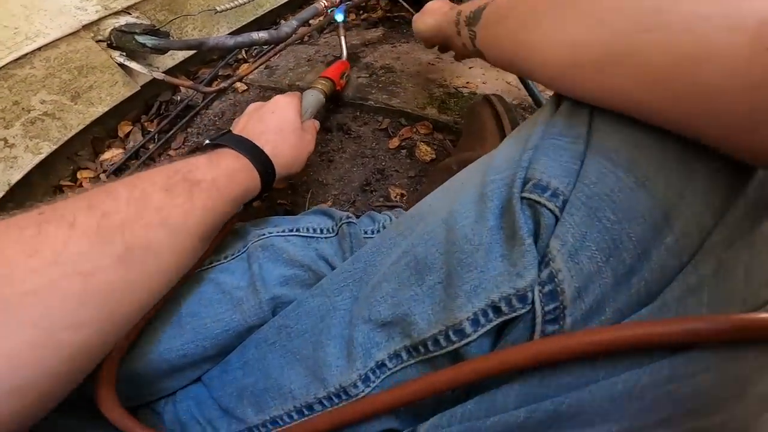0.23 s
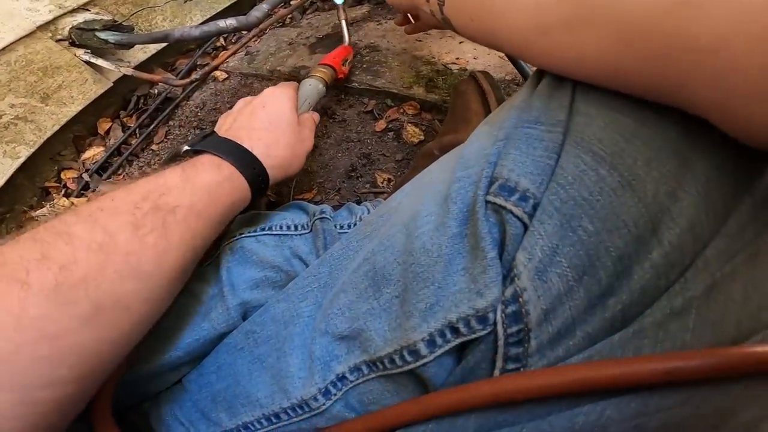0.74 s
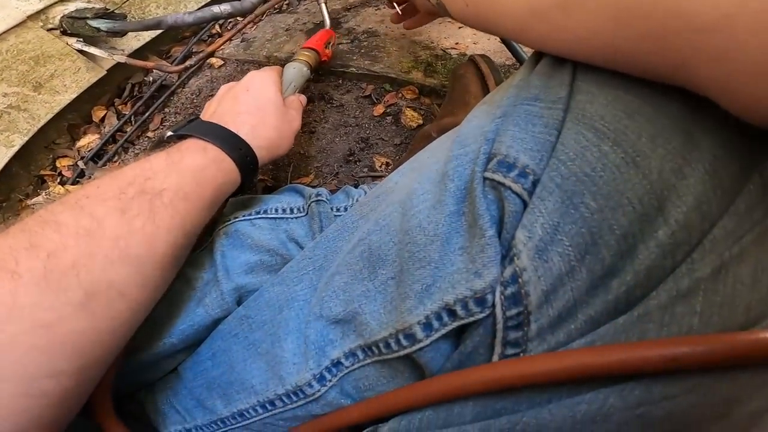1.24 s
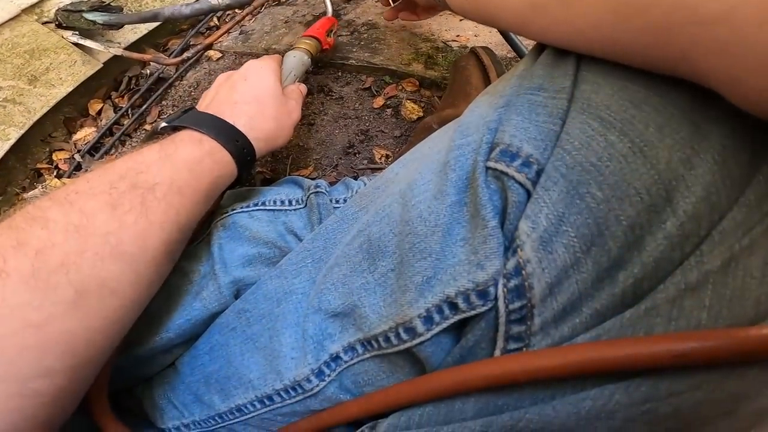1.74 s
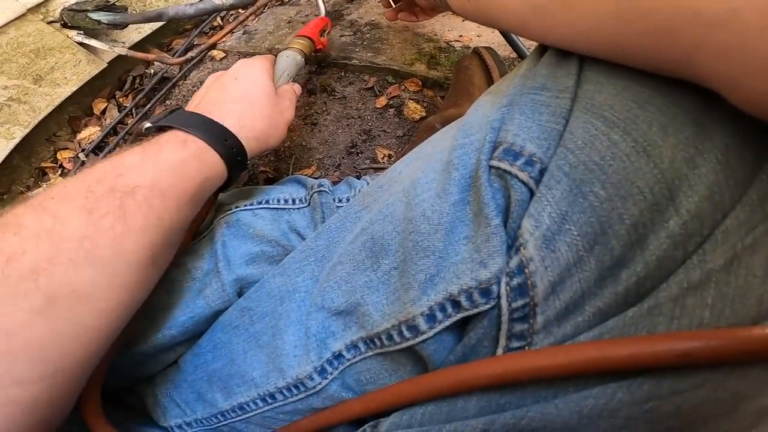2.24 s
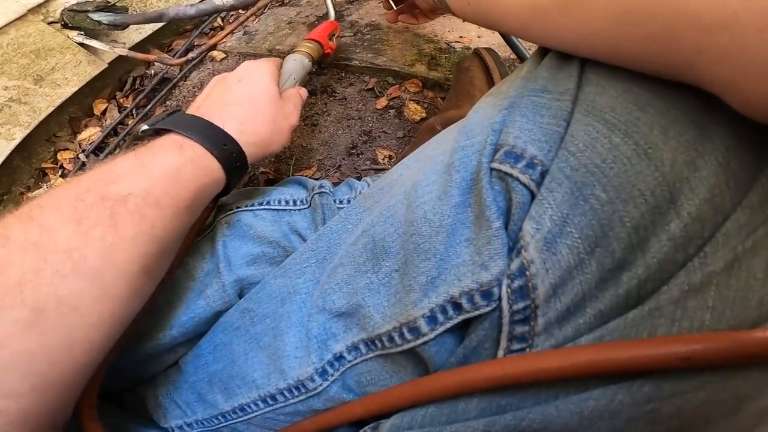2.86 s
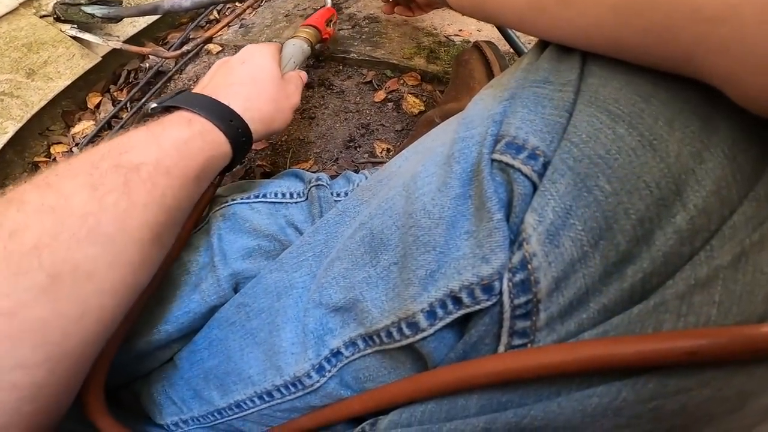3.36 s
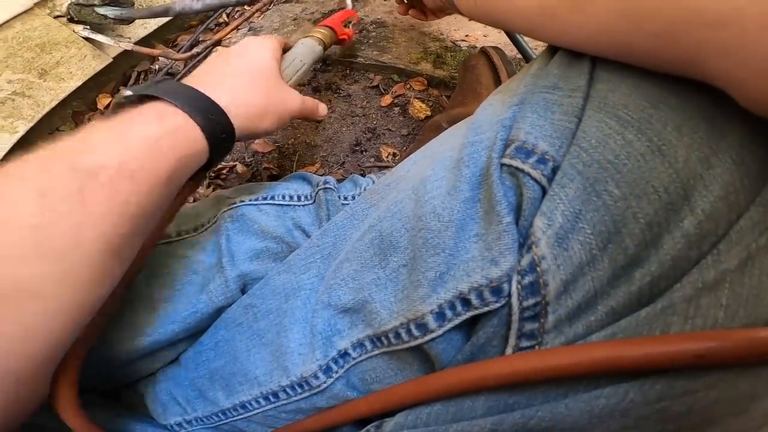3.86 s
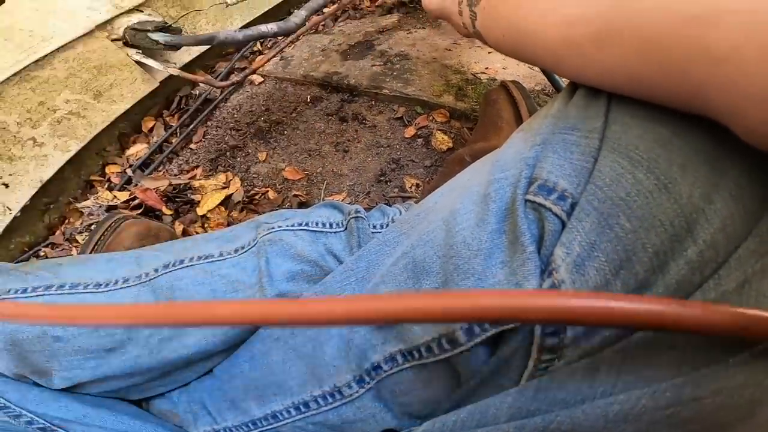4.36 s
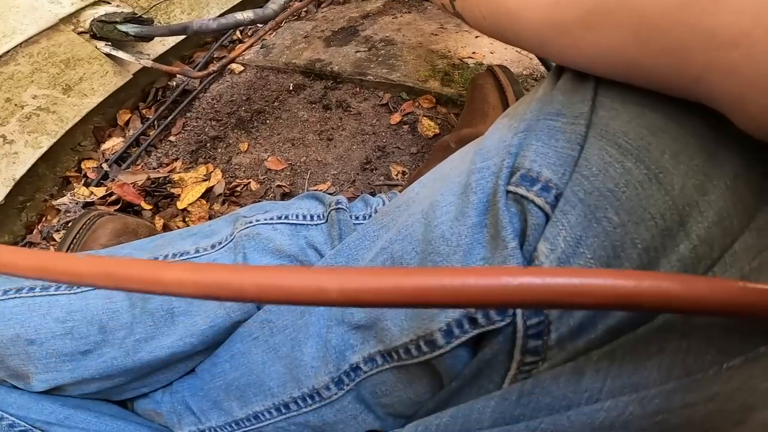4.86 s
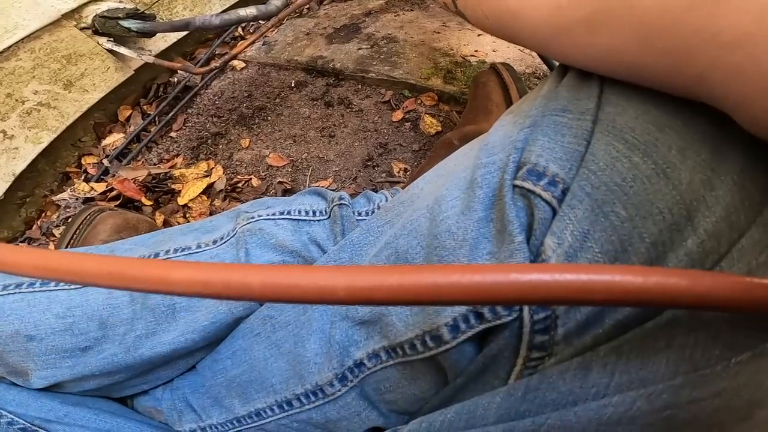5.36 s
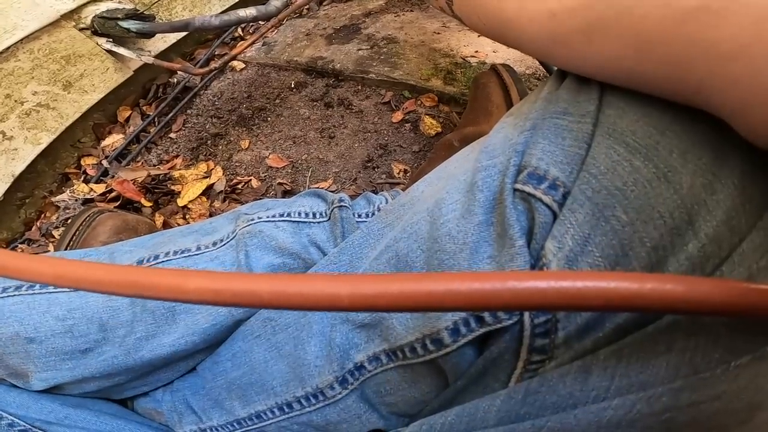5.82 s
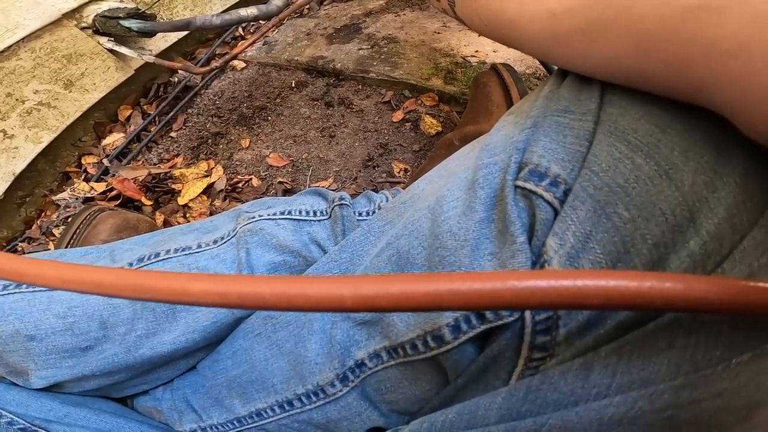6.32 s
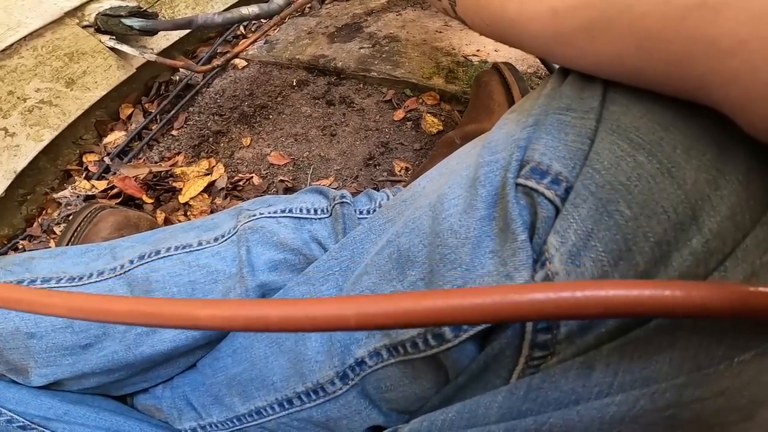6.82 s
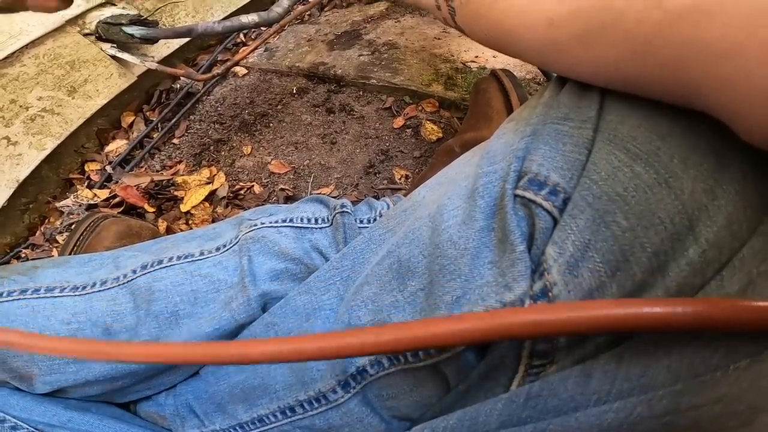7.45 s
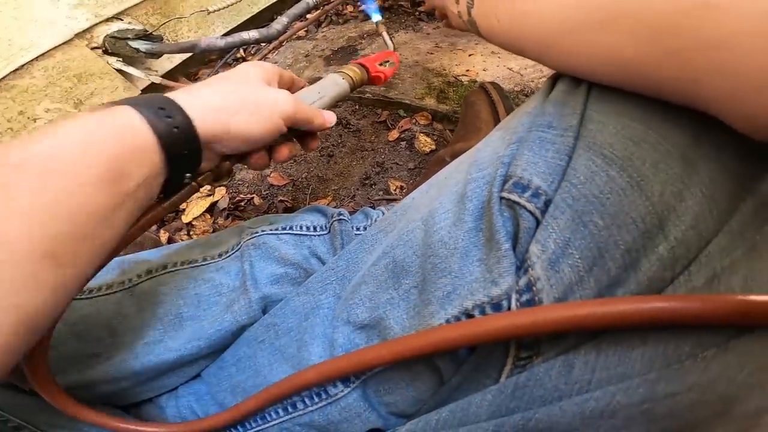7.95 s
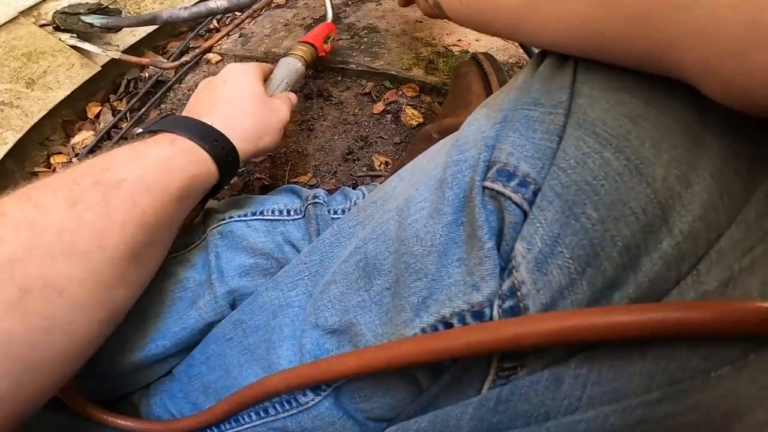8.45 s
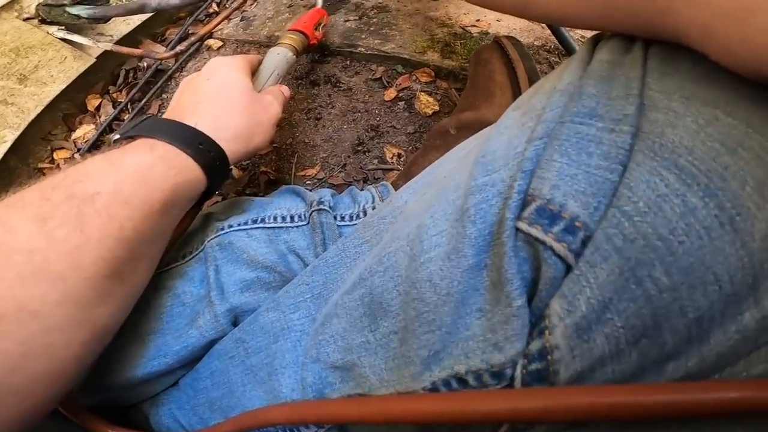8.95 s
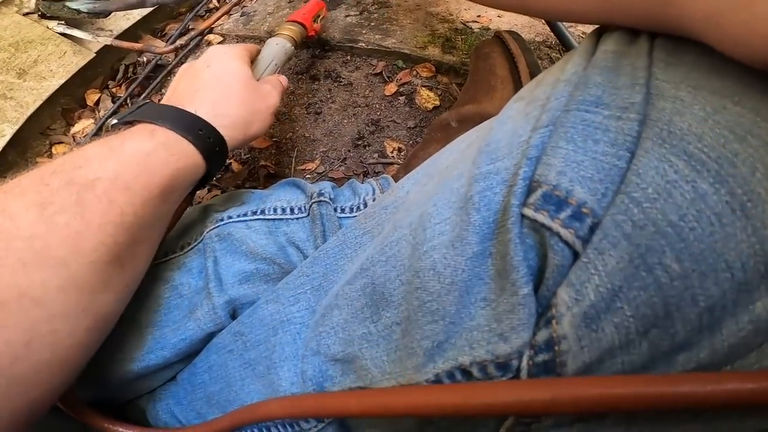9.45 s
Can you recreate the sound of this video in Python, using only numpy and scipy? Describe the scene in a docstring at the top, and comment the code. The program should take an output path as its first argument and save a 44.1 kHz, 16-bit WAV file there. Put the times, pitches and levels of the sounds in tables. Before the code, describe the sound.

Heard from chest height in an outdoor spot, a gas torch flame hisses and roars without a break while heating a pipe joint. Its loudness stays even, but the colour shifts and swishes slightly whenever the hand moves, and a thin, airy whistle drifts up and down. The low roar eases for a couple of seconds, then returns. Far-off rumble is barely there, and a soft hum rises late.

```python
"""Brazing torch outdoors

A turbulent gas flame roars low and hisses high, with a breathy whistle from the jet. Reflections off
a wall, the ground and the seated worker's knees comb the noise at two chest-high microphone ports.
The comb holds while the hand is still and slides as the torch swings aside and back.
A far rumble lies underneath, and a faint hum comes up late."""
import sys
import numpy as np
from scipy import signal
from scipy.fft import rfft, irfft, next_fast_len
from scipy.io import wavfile
from scipy.ndimage import uniform_filter1d, map_coordinates

SR = 44100
rng = np.random.default_rng(int(sys.argv[2]) if len(sys.argv) > 2 else 0)


def generate_wav(signal):
    """Clip the signal to [-1, 1] and save it as 16-bit WAV at the path in sys.argv[1]."""
    frames = np.transpose(np.atleast_2d(signal))
    scaled = np.clip(frames, -1, 1) * 32767
    pcm = np.round(scaled).astype(np.int16)
    wavfile.write(sys.argv[1], SR, pcm)


N = 427329
FRAME_SAMPLES, OVERLAP_SAMPLES = 1024, 768


def amp(db):
    """dB to gain."""
    return 10 ** (np.asarray(db) / 20)


def unit_rms(x):
    """Scale to rms 1."""
    return x / np.sqrt(np.mean(x ** 2) + 1e-20)


def over_frequency(rows, hz):
    """Interpolate (freq_hz, value) rows on a log axis."""
    freq_hz, values = np.transpose(rows)
    return np.interp(np.log(hz + 1), np.log(freq_hz + 1), values)


def over_time(rows, t):
    """Interpolate each column after time_s at times t."""
    time_s, *columns = np.transpose(rows)
    return [np.interp(t, time_s, column) for column in columns]


def wobble(rate_hz, size):
    """Smooth random curve spanning the scene, rate_hz knots a second."""
    knots = N * rate_hz / SR
    return map_coordinates(rng.standard_normal(int(knots) + 4), [np.linspace(0, knots, size)])


def noise_spectra(channels):
    """Frequencies, times and short-time spectra of white noise."""
    white = rng.standard_normal((channels, N))
    return signal.stft(white, SR, nperseg=FRAME_SAMPLES, noverlap=OVERLAP_SAMPLES)


def to_samples(spectra):
    """Short-time spectra to waveforms."""
    return signal.istft(spectra, SR, nperseg=FRAME_SAMPLES, noverlap=OVERLAP_SAMPLES)[1][:, :N]


# Rumble spectrum: freq_hz, level_db
RUMBLE_SPECTRUM = [(20, -16), (45, 2), (80, 9), (140, -12), (300, -42)]


def rumble(level_db=-46):
    """Steady low noise of the neighbourhood, mostly common to both ports."""
    hz, _, noise = noise_spectra(channels=3)
    stereo = noise[0] + 0.42 * noise[1:]
    colour = amp(over_frequency(RUMBLE_SPECTRUM, hz))[:, None]
    return amp(level_db) * unit_rms(to_samples(colour * stereo))


# Hum course: time_s, pitch_hz, peak_db
HUM_TRACK = [(0, 71, -64), (7.3, 71, -56), (7.7, 71, -43), (9.69, 71, -42)]


def hum(wander_hz=2.5, waver_db=2.0):
    """Low, slightly unsteady tone from far off."""
    pitch_hz, peak_db = over_time(HUM_TRACK, np.arange(N) / SR)
    cycles = np.cumsum(pitch_hz + wander_hz * wobble(rate_hz=6, size=N)) / SR
    return amp(peak_db + waver_db * wobble(rate_hz=6, size=N)) * np.sin(2 * np.pi * cycles)


def sliding_comb(echoes, hz, drift_dm):
    """Sum of echoes whose delays follow the hand's drift; axes: port, frequency, time."""
    response = 0
    for left_ms, right_ms, left_gain, right_gain, slide_ms_per_dm in echoes:
        delay = np.exp(-2j * np.pi * np.outer([left_ms, right_ms], hz) / 1000)
        slide = np.exp(-2j * np.pi * np.outer(hz, slide_ms_per_dm * drift_dm) / 1000)
        echo = np.array([[left_gain], [right_gain]]) * delay
        response += echo[:, :, None] * slide
    return response / (1 + (hz[:, None] / 14000) ** 2)  # cloth and leaves absorb the top


def clutter_echoes(count, gain=0.09, slide_ms_per_dm=0.1):
    """Echo rows for weak, later reflections off litter and cables, each from its own side."""
    distance, side, strength, balance, slide = np.hsplit(rng.standard_normal((count, 5)), 5)
    delays_ms = 3.2 + 3 * np.abs(distance) + 0.03 * side * [1, -1]
    gains = gain * (strength + 0.4 * balance * [1, -1])
    return np.c_[delays_ms, gains, slide_ms_per_dm * slide]


# Near reflections, a list per torch position: left_ms, right_ms, left_gain, right_gain, slide_ms_per_dm
NEAR_ECHOES = [
    [(0.2, 0.193, -0.14, -0.21, 0.009), (0.323, 0.326, -0.18, -0.22, 0.002),
     (0.459, 0.458, -0.13, -0.18, -0.073), (0.668, 0.67, 0.14, 0.11, 0.123),
     (0.749, 0.745, -0.38, -0.35, -0.008), (0.767, 0.788, 0.11, 0.21, -0.085),
     (0.891, 0.902, -0.23, -0.09, -0.082), (1.142, 1.143, 0.13, 0.12, 0.063),
     (1.397, 1.423, 0.03, 0.13, -0.009), (1.595, 1.608, -0.18, -0.24, -0.002),
     (1.836, 1.808, -0.09, -0.09, -0.172), (1.88, 1.883, -0.13, -0.13, 0.004),
     (2.125, 2.121, 0.16, 0.12, 0.003), (2.276, 2.292, 0.12, 0.12, 0.049),
     (2.45, 2.47, -0.17, -0.14, 0.003), (3.443, 3.433, 0.09, 0.09, -0.015)],
    [(0.167, 0.165, 0.25, 0.27, 0.007), (0.186, 0.186, -0.18, -0.36, 0.007),
     (0.358, 0.342, -0.23, -0.27, 0.023), (0.449, 0.432, -0.15, -0.06, -0.162),
     (0.512, 0.592, 0.2, 0.12, 0.009), (0.527, 0.497, -0.07, -0.2, 0.175),
     (0.654, 0.624, 0.09, -0.21, 0.028), (0.812, 0.805, -0.1, -0.06, 0.154),
     (0.869, 0.877, -0.26, -0.22, 0.046), (1.228, 1.223, 0.17, 0.11, 0.079),
     (1.612, 1.648, -0.08, -0.18, 0.061), (1.668, 1.666, -0.02, -0.13, -0.063),
     (1.898, 1.894, -0.12, -0.1, -0.023), (2.17, 2.163, 0.13, 0.1, 0.079),
     (2.354, 2.329, 0.09, 0.14, 0.036), (2.449, 2.489, -0.13, -0.09, -0.034)],
    [(0.144, 0.145, 0.05, 0.08, 0.157), (0.205, 0.186, -0.09, -0.14, -0.005),
     (0.326, 0.35, -0.05, -0.17, -0.023), (0.415, 0.422, -0.07, -0.05, -0.212),
     (0.417, 0.42, 0.08, 0.05, 0.173), (0.545, 0.488, 0.16, -0.05, 0.018),
     (0.706, 0.733, -0.17, -0.16, -0.035), (0.791, 0.796, -0.31, -0.21, 0.001),
     (0.853, 0.859, 0.18, 0.24, -0.048), (0.98, 0.982, -0.22, -0.18, -0.023),
     (1.154, 1.139, 0.22, 0.24, -0.042), (1.304, 1.281, 0.07, 0.06, 0.192),
     (1.573, 1.605, -0.07, -0.14, -0.004), (1.66, 1.686, -0.12, -0.18, -0.001),
     (1.692, 1.696, 0.07, 0.08, -0.165), (1.779, 1.802, 0.14, 0.11, -0.004),
     (1.83, 1.84, -0.05, -0.06, -0.199), (2.231, 2.224, 0.05, 0.07, -0.057),
     (2.312, 2.32, 0.06, 0.04, -0.148), (2.34, 2.359, 0.09, 0.06, 0.02),
     (2.981, 2.978, -0.05, -0.05, 0.218), (3.201, 3.229, 0.04, 0.06, 0.041),
     (4.133, 4.145, -0.05, -0.04, -0.036)],
    [(0.169, 0.09, 0.28, -0.21, 0.006), (0.203, 0.195, -0.39, -0.18, 0.005),
     (0.247, 0.274, 0.37, 0.06, 0.012), (0.29, 0.318, -0.22, -0.29, 0.006),
     (0.534, 0.534, 0.16, -0.19, 0.006), (0.673, 0.688, -0.16, -0.12, 0.033),
     (0.748, 0.745, -0.2, -0.17, 0.047), (0.877, 0.869, 0.13, 0.2, -0.013),
     (0.946, 0.943, -0.23, -0.25, 0.036), (1.116, 1.108, 0.14, 0.12, 0.025),
     (1.389, 1.42, 0.12, -0.1, 0.011), (1.505, 1.517, -0.08, -0.07, 0.09),
     (1.594, 1.609, -0.07, -0.12, 0.006), (1.701, 1.687, -0.12, -0.12, -0.024),
     (1.768, 1.81, 0.1, 0.11, 0.01), (2.24, 2.191, 0.12, 0.16, 0.015), (2.336, 2.258, 0.08, 0.06, 0.023),
     (2.486, 2.49, -0.07, -0.09, 0.03), (2.665, 2.675, 0.07, 0.04, -0.076),
     (2.71, 2.731, -0.12, -0.07, 0.008), (3.171, 3.21, 0.09, 0.05, -0.017), (3.51, 3.513, 0.08, 0.06, 0.01),
     (3.697, 3.711, 0.05, 0.04, -0.002)],
    [(0.076, 0.074, -0.24, -0.31, 0.002), (0.189, 0.167, -0.14, -0.25, -0.0),
     (0.333, 0.322, -0.2, -0.29, 0.002), (0.444, 0.448, -0.09, -0.08, 0.013),
     (0.526, 0.553, 0.1, -0.21, 0.014), (0.658, 0.68, -0.32, -0.19, 0.007),
     (0.733, 0.725, -0.27, -0.2, 0.01), (0.807, 0.803, 0.08, 0.07, 0.14),
     (0.929, 0.932, -0.28, -0.26, 0.016), (0.982, 0.974, 0.06, 0.05, -0.125),
     (1.098, 1.091, 0.08, 0.05, -0.036), (1.132, 1.124, 0.1, 0.08, 0.069),
     (1.184, 1.18, -0.06, -0.14, 0.016), (1.392, 1.391, 0.12, -0.06, 0.032),
     (1.506, 1.481, -0.17, -0.13, 0.038), (1.696, 1.699, -0.06, -0.14, 0.018),
     (1.863, 1.89, 0.11, 0.1, 0.04), (2.253, 2.205, 0.18, 0.13, 0.033), (2.351, 2.318, 0.11, 0.06, 0.016),
     (2.498, 2.497, -0.08, -0.09, 0.023), (2.715, 2.723, -0.07, -0.04, 0.033),
     (3.188, 3.211, 0.08, 0.05, -0.01), (3.924, 3.941, -0.06, -0.02, 0.029)],
    [(0.09, 0.09, -0.59, -0.6, -0.004), (0.202, 0.185, -0.36, -0.43, -0.002),
     (0.3, 0.3, -0.45, -0.47, -0.009), (0.379, 0.372, -0.37, -0.37, -0.003),
     (0.535, 0.53, -0.18, -0.26, -0.043), (0.642, 0.635, -0.31, -0.33, 0.002),
     (0.737, 0.726, -0.26, -0.26, 0.018), (0.911, 0.882, -0.23, -0.21, 0.125),
     (1.061, 1.066, -0.25, -0.17, 0.087), (1.347, 1.35, -0.08, -0.1, -0.184),
     (1.364, 1.375, 0.15, 0.18, 0.26), (1.611, 1.611, 0.1, 0.14, 0.24), (1.85, 1.862, 0.18, 0.14, -0.074),
     (2.051, 2.047, 0.17, 0.12, 0.069), (2.365, 2.341, 0.13, 0.15, 0.059), (2.548, 2.486, 0.15, 0.1, 0.102)],
    [(0.155, 0.154, 0.45, 0.37, 0.233), (0.174, 0.17, -0.51, -0.4, 0.201),
     (0.243, 0.208, -0.23, -0.22, -0.019), (0.284, 0.269, -0.14, -0.11, 0.148),
     (0.309, 0.289, -0.24, -0.21, 0.004), (0.384, 0.366, -0.2, -0.25, 0.073),
     (0.514, 0.483, -0.15, -0.11, 0.147), (0.613, 0.588, 0.11, 0.16, 0.024),
     (0.686, 0.688, 0.07, 0.14, -0.139), (0.76, 0.773, -0.23, -0.18, 0.023),
     (0.952, 0.93, -0.2, -0.14, -0.018), (1.081, 1.053, -0.1, -0.13, 0.1),
     (1.116, 1.106, -0.17, -0.09, -0.01), (1.142, 1.148, -0.19, -0.15, -0.126),
     (1.775, 1.767, 0.14, 0.14, -0.0), (2.007, 1.993, -0.07, -0.16, -0.064)],
    [(0.121, 0.107, 0.11, 0.11, 0.131), (0.217, 0.22, -0.26, -0.1, 0.017),
     (0.251, 0.232, -0.07, -0.07, -0.185), (0.356, 0.346, -0.1, -0.13, 0.057),
     (0.536, 0.511, -0.05, -0.11, 0.057), (0.537, 0.417, 0.13, 0.2, -0.06),
     (0.569, 0.572, 0.15, 0.25, -0.001), (0.732, 0.729, -0.15, -0.2, 0.009),
     (0.987, 0.95, -0.28, -0.15, -0.016), (1.157, 1.146, 0.07, 0.09, 0.072),
     (1.192, 1.2, 0.12, 0.11, -0.111), (1.223, 1.212, -0.18, -0.19, -0.062),
     (1.384, 1.413, 0.08, 0.12, 0.0), (1.539, 1.521, -0.24, -0.14, -0.066),
     (1.747, 1.719, 0.09, 0.09, -0.004), (1.809, 1.812, -0.13, -0.17, -0.061),
     (1.98, 2.002, 0.09, 0.07, 0.171), (2.167, 2.124, -0.08, -0.09, -0.15),
     (2.472, 2.459, -0.08, -0.1, -0.009), (2.539, 2.507, 0.1, 0.08, -0.07),
     (2.749, 2.728, -0.13, -0.08, -0.009), (3.361, 3.342, 0.07, 0.09, -0.126),
     (3.84, 3.882, -0.07, -0.05, -0.03)],
    [(0.144, 0.143, 0.18, 0.24, -0.167), (0.151, 0.163, 0.15, 0.15, -0.019),
     (0.171, 0.159, -0.19, -0.26, -0.09), (0.21, 0.208, 0.08, 0.12, -0.183),
     (0.313, 0.339, 0.2, 0.18, 0.027), (0.474, 0.462, 0.26, 0.07, 0.009), (0.565, 0.552, 0.32, 0.24, 0.012),
     (0.773, 0.773, 0.07, 0.05, 0.027), (0.885, 0.882, 0.06, 0.12, -0.026),
     (0.971, 0.942, -0.09, 0.01, 0.063), (1.078, 1.065, 0.15, 0.15, 0.0),
     (1.213, 1.174, -0.06, -0.07, 0.162), (1.224, 1.233, 0.11, 0.1, 0.038),
     (1.358, 1.359, 0.16, 0.15, -0.001), (1.494, 1.494, -0.19, -0.12, 0.02),
     (1.704, 1.708, -0.04, -0.11, 0.02), (1.989, 2.01, -0.15, -0.16, 0.012),
     (2.199, 2.16, 0.07, 0.08, -0.045), (2.687, 2.635, -0.05, -0.07, 0.024),
     (2.859, 2.811, -0.08, -0.08, 0.027), (3.813, 3.813, -0.07, -0.02, 0.013),
     (4.388, 4.371, -0.06, -0.03, 0.016), (5.239, 5.259, 0.05, 0.02, -0.007)],
    [(0.192, 0.185, -0.24, -0.2, -0.201), (0.193, 0.197, -0.27, -0.3, -0.001),
     (0.245, 0.236, -0.1, -0.24, 0.122), (0.297, 0.311, -0.37, -0.38, 0.024),
     (0.302, 0.287, -0.15, -0.19, -0.177), (0.425, 0.429, -0.12, -0.13, 0.213),
     (0.556, 0.677, -0.13, -0.07, -0.288), (0.643, 0.665, -0.18, -0.13, 0.183),
     (0.669, 0.643, -0.25, -0.24, -0.009), (0.743, 0.727, -0.24, -0.28, -0.014),
     (0.882, 0.887, 0.13, 0.08, -0.015), (1.1, 1.11, -0.1, -0.12, 0.105), (1.588, 1.56, 0.16, 0.13, 0.11),
     (1.74, 1.731, -0.07, -0.15, 0.117), (2.59, 2.591, 0.06, 0.12, -0.006),
     (2.868, 2.86, -0.06, -0.09, 0.134)],
    [(0.109, 0.099, 0.21, 0.22, 0.189), (0.224, 0.212, -0.15, -0.41, 0.005),
     (0.26, 0.245, 0.32, 0.41, 0.014), (0.302, 0.312, -0.23, -0.2, 0.019),
     (0.697, 0.691, -0.23, -0.23, 0.006), (0.801, 0.799, -0.13, -0.16, 0.088),
     (0.884, 0.856, -0.16, -0.12, -0.121), (1.107, 1.128, -0.18, -0.17, -0.053),
     (1.15, 1.168, 0.12, 0.18, 0.024), (1.578, 1.546, 0.18, 0.09, -0.057),
     (1.718, 1.723, -0.11, -0.09, -0.112), (1.845, 1.852, 0.13, 0.1, 0.07),
     (2.13, 2.092, 0.18, 0.11, 0.039), (2.352, 2.357, 0.06, 0.1, 0.002), (2.579, 2.59, 0.06, 0.09, 0.055),
     (3.028, 3.011, -0.08, -0.07, -0.117)],
    [(0.097, 0.095, -0.5, -0.4, 0.014), (0.126, 0.118, -0.18, -0.12, -0.117),
     (0.159, 0.169, 0.43, 0.19, -0.077), (0.184, 0.178, -0.38, -0.43, 0.0),
     (0.204, 0.187, -0.11, -0.03, -0.042), (0.296, 0.287, -0.28, -0.23, -0.047),
     (0.357, 0.356, -0.25, -0.28, 0.039), (0.554, 0.568, -0.18, -0.24, -0.153),
     (0.572, 0.556, -0.25, -0.2, 0.145), (0.686, 0.689, -0.28, -0.2, 0.034),
     (0.772, 0.757, -0.16, -0.14, 0.2), (0.782, 0.774, -0.4, -0.29, -0.063),
     (0.946, 0.913, 0.1, 0.12, -0.144), (0.996, 1.004, -0.35, -0.29, -0.068),
     (1.172, 1.176, 0.11, 0.1, -0.159), (1.29, 1.286, -0.16, -0.2, -0.059),
     (1.62, 1.611, -0.15, -0.15, -0.01), (1.673, 1.678, -0.13, -0.21, 0.019),
     (2.129, 2.119, -0.11, -0.12, -0.065), (2.315, 2.328, 0.11, 0.07, 0.136),
     (2.736, 2.734, -0.15, -0.13, 0.007), (3.025, 3.025, -0.09, -0.05, 0.04),
     (4.064, 4.053, -0.07, -0.06, 0.181)],
    [(0.202, 0.178, 0.0, -0.11, -0.019), (0.33, 0.377, -0.29, 0.01, 0.013),
     (0.494, 0.485, 0.09, -0.12, -0.017), (0.641, 0.679, -0.29, -0.11, 0.0),
     (0.667, 0.714, -0.08, -0.04, 0.168), (0.715, 0.727, -0.05, 0.01, 0.007),
     (0.869, 0.824, 0.14, 0.03, -0.229), (0.883, 0.889, -0.06, -0.11, -0.074),
     (0.918, 0.931, -0.35, -0.17, -0.01), (1.08, 1.025, 0.18, 0.09, 0.009),
     (1.091, 1.049, 0.17, 0.05, 0.124), (1.32, 1.355, -0.03, -0.1, 0.011),
     (1.506, 1.569, -0.04, -0.07, -0.071), (1.559, 1.554, -0.24, -0.0, 0.072),
     (1.644, 1.663, -0.15, -0.23, -0.029), (1.81, 1.811, 0.18, 0.18, -0.046),
     (1.946, 1.916, -0.07, -0.08, 0.093), (2.277, 2.158, 0.11, 0.08, 0.039),
     (2.355, 2.307, 0.31, 0.11, 0.052), (2.762, 2.746, -0.05, -0.09, 0.019),
     (2.929, 2.906, -0.11, -0.03, -0.088), (3.241, 3.237, -0.11, -0.03, -0.075),
     (4.544, 4.521, -0.05, -0.06, 0.03)],
]
# Hand wander, a list per torch position: time_s, drift_dm
HAND_DRIFT = [
    [(0.0, -1.17), (0.1, 0.19), (0.21, 0.88)],
    [(0.21, -0.4), (0.32, -0.53), (0.44, 1.47)],
    [(0.44, 0.18), (0.73, -1.2), (1.01, 0.08), (1.3, 0.6)],
    [(1.3, -0.83), (1.62, -0.13), (1.93, 0.87), (2.25, -0.2)],
    [(2.25, -0.14), (2.67, 1.39), (3.09, -0.13), (3.51, -1.13), (3.93, 0.58)],
    [(3.93, -0.94), (4.06, 0.09), (4.18, 0.61)],
    [(4.18, -0.63), (4.35, -0.59), (4.52, 1.33)],
    [(4.52, -0.99), (4.7, -0.78), (4.87, 0.39), (5.05, 0.96)],
    [(5.05, -0.05), (5.67, -0.15), (6.29, -0.6), (6.91, 1.06), (7.53, 0.93)],
    [(7.53, -1.45), (7.7, 0.55), (7.86, 0.52)],
    [(7.86, -0.54), (8.05, -0.69), (8.24, 0.75)],
    [(8.24, -1.45), (8.43, 0.22), (8.62, 0.26), (8.8, 0.45)],
    [(8.8, -1.19), (9.1, 0.16), (9.39, 0.34), (9.69, 0.47)],
]
# Moves to the next position: midpoint_s
TORCH_MOVES = [.21, .44, 1.3, 2.25, 3.93, 4.185, 4.52, 5.05, 7.53, 7.86, 8.245, 8.8]


def sound_paths(hz, t, direct_gain=0.87, move_s=0.07, limb_hz=305):
    """Direct sound past the arms and knees plus echoes, crossfaded between torch positions."""
    moves_done = np.clip((t - np.array(TORCH_MOVES)[:, None]) / move_s + 0.5, 0, 1)
    position = moves_done.sum(axis=0)
    # Arms, knees and kerb are too small to reflect bass; litter reflects only treble.
    limb_highpass = (hz ** 2 / (hz ** 2 + limb_hz ** 2))[:, None]
    clutter_highpass = (hz / (hz + 2500))[:, None]
    paths = np.full((2, len(hz), len(t)), direct_gain, complex)
    for index, (echoes, drift) in enumerate(zip(NEAR_ECHOES, HAND_DRIFT)):
        weight = 1 - np.abs(position - index)
        active = weight > 0
        drift_dm, = over_time(drift, t[active])
        near = sliding_comb(echoes, hz, drift_dm) * limb_highpass
        clutter = sliding_comb(clutter_echoes(count=4), hz, drift_dm) * clutter_highpass
        paths[:, :, active] += (near + clutter) * weight[active]
    return paths


# Port colour: freq_hz, left_over_right_db
PORT_BALANCE = [(300, .6), (700, -1.3), (1400, 4), (3000, 3), (5500, 0), (10000, -0.3), (14000, -3)]


def port_response(hz, left_lag_s=0.016e-3):
    """Each port has its own colour; the right one is a few millimetres nearer the flame."""
    lag = np.exp(-2j * np.pi * np.outer([left_lag_s, 0], hz))
    balance = amp(np.outer([0.5, -0.5], over_frequency(PORT_BALANCE, hz)))
    return (lag * balance)[:, :, None]


# Jet whistle: time_s, pitch_hz, level_db
WHISTLE_TRACK = [(0, 3400, -2), (.13, 3500, -6), (.3, 4000, -10), (.46, 3520, -4), (.83, 3360, -7.5),
                 (1.15, 3560, -9), (1.4, 3760, -5), (1.91, 3470, -8), (2.3, 3800, -6), (2.8, 3480, -7),
                 (3.2, 3680, -21), (3.9, 3550, -9), (4.2, 3400, -11), (4.4, 3320, -8), (4.6, 3440, -6.5),
                 (4.85, 3580, -7.5), (5.1, 3720, -7.5), (5.8, 3790, -2), (6.4, 3790, -5.5),
                 (6.9, 3670, -10), (7.4, 3670, -13), (7.62, 3380, -6), (7.95, 3520, -6), (8.2, 3800, -9),
                 (8.35, 3380, -5), (8.7, 3440, -10), (8.95, 3800, -7), (9.69, 3780, -14)]


def jet_whistle(hz, t, half_width_hz=55, wander_hz=15, waver_db=1.5):
    """Gain of a narrow jet resonance that glides as the flame bends round the pipe."""
    pitch_hz, level_db = over_time(WHISTLE_TRACK, t)
    centre_hz = pitch_hz + wander_hz * wobble(rate_hz=4, size=len(t))
    resonance = 1 / np.sqrt(1 + ((hz[:, None] - centre_hz) / half_width_hz) ** 4)
    return amp(level_db + waver_db * wobble(rate_hz=5, size=len(t))) * resonance


# Flame noise spectrum: freq_hz, level_db
FLAME_SPECTRUM = [(25, -36), (60, -14.5), (150, -2), (330, -5.5), (500, -16), (1000, -10.5), (1900, -20),
                  (2600, -3.5), (3650, 0), (4500, -7), (6500, -14), (9000, -21.5), (12000, -31),
                  (15200, -46)]
# Low and high bands relative to the hiss: time_s, roar_db, fizz_db
FLAME_SWELLS = [(0, 2, 5), (.2, 1.5, 7), (.6, 2.5, 1), (1.3, 1, 2.5), (2.4, 2, 1.5), (3.8, 2.5, 1.5),
                (4.2, 1, -2.5), (4.7, 1, 3), (5.5, -5.5, 0.5), (6.9, -4, 1), (7.6, 3, 1), (8.0, 2.5, 0.5),
                (8.5, 1, -1), (9.1, 3.5, 4), (9.69, 3.5, 2.5)]


def flame(hz, t, gain_db=-8, waver_db=0.3, flutter_db=1):
    """Gain of the flame noise: roar and hiss waver, the fizz flutters with the outer flame."""
    roar_band = 1 / (1 + (hz / 600) ** 4)[:, None]
    fizz_band = 1 / (1 + (7000 / (hz + 1)) ** 6)[:, None]
    hiss_band = 1 - roar_band - fizz_band
    roar_db, fizz_db = over_time(FLAME_SWELLS, t)
    roar_db += waver_db * wobble(rate_hz=8.8, size=len(t))
    fizz_db += flutter_db * wobble(rate_hz=10, size=len(t))
    hiss_db = waver_db * wobble(rate_hz=4.6, size=len(t))
    swell_db = roar_band * roar_db + hiss_band * hiss_db + fizz_band * fizz_db
    return amp(over_frequency(FLAME_SPECTRUM, hz)[:, None] + swell_db + gain_db)


def turbulence(shape, depth_db=1.33):
    """Faint random patches of gain over frequency and time."""
    patches = uniform_filter1d(rng.standard_normal(shape), size=10, axis=0)
    patches = uniform_filter1d(patches, size=10, axis=1)
    return amp(depth_db * unit_rms(patches))


# Diffuse sound relative to the flame: freq_hz, level_db
DIFFUSE_SPECTRUM = [(30, -9), (50, -10), (150, -18.5), (600, -13.5), (1400, -5), (3600, -9.5), (5000, -1),
                    (9000, -2), (14000, -13)]


def torch(hold_frames=4):
    """One turbulent jet heard over many paths, plus a diffuse part unrelated between the ports."""
    hz, t, noise = noise_spectra(channels=3)
    colour = np.hypot(flame(hz, t), jet_whistle(hz, t))
    colour *= turbulence(colour.shape)
    update_s = t[hold_frames // 2::hold_frames]
    held = np.minimum(np.arange(len(t)) // hold_frames, len(update_s) - 1)
    paths = (sound_paths(hz, update_s) * port_response(hz))[:, :, held]
    coherent = paths * noise[0]
    diffuse = np.abs(paths) * amp(over_frequency(DIFFUSE_SPECTRUM, hz))[:, None] * noise[1:]
    return to_samples(colour * (coherent + diffuse))


def scene():
    """Torch over hum and rumble."""
    return torch() + hum() + rumble()


def record(dry, target_db=-20, levelling=0.4, ceiling=0.62, cutoff_hz=15200):
    """Gain control reduces swells, a soft limiter rounds peaks, a low-pass cuts the top."""
    power = np.abs(uniform_filter1d(np.mean(dry ** 2, axis=0), size=1500))
    level_db = 10 * np.log10(power + 1e-12)
    levelled = dry * amp(levelling * (target_db - level_db))
    limited = levelled / (1 + np.abs(levelled / ceiling) ** 4) ** (1 / 4)
    fft_size = next_fast_len(N + SR // 2)
    passband = np.fft.rfftfreq(fft_size, 1 / SR) < cutoff_hz
    return irfft(rfft(limited, fft_size) * passband, fft_size)[:, :N]


dry = scene()
out = record(dry)
generate_wav(out)
```